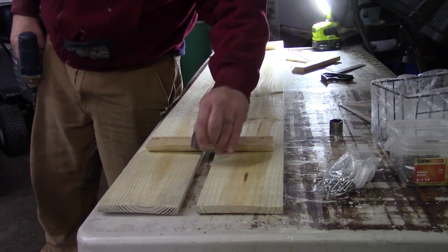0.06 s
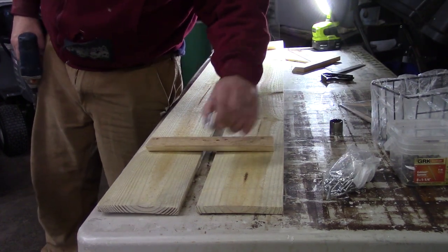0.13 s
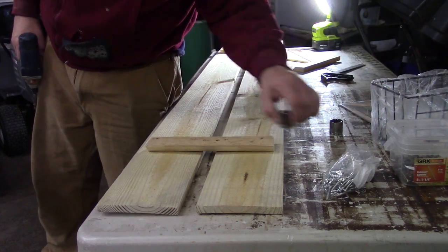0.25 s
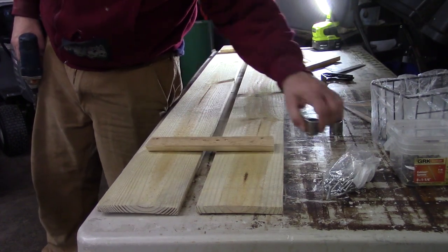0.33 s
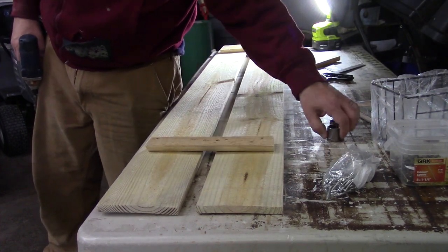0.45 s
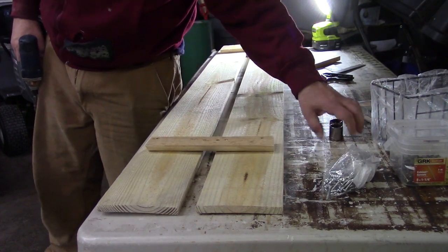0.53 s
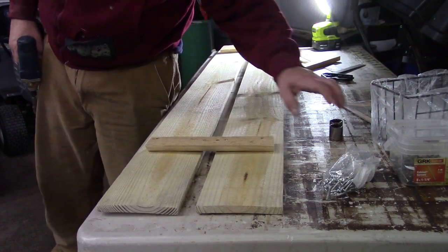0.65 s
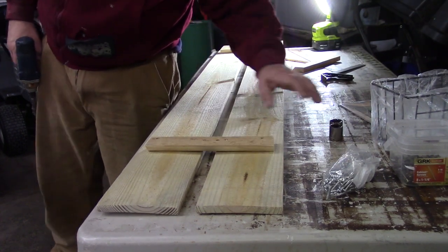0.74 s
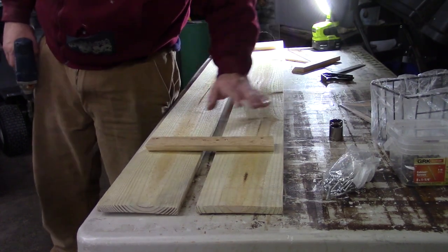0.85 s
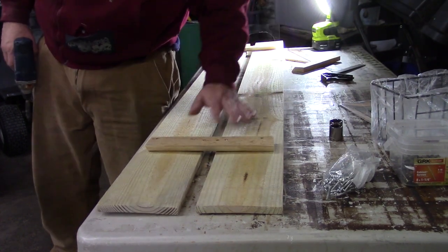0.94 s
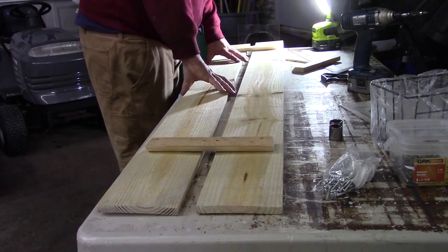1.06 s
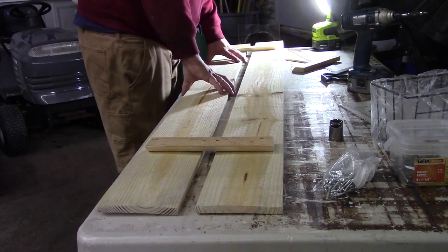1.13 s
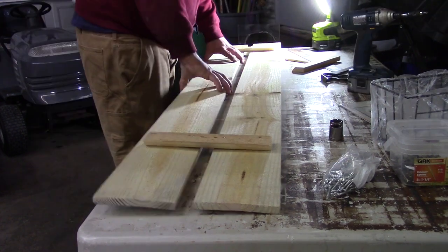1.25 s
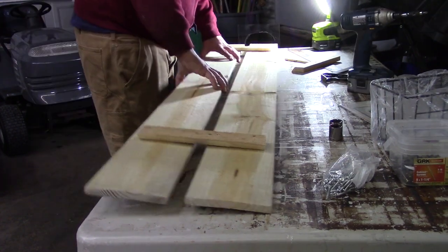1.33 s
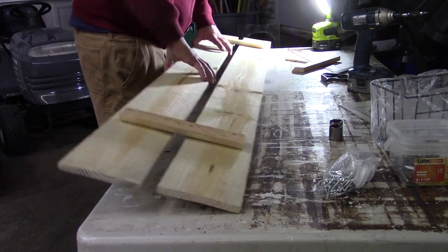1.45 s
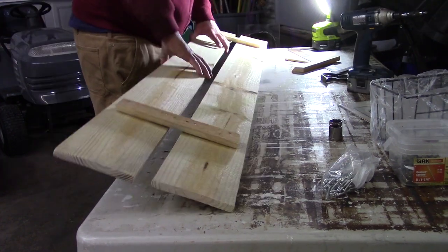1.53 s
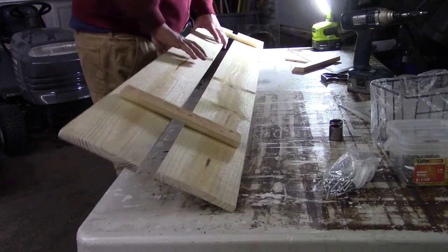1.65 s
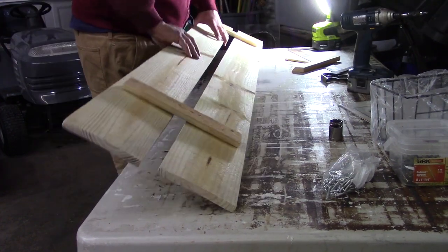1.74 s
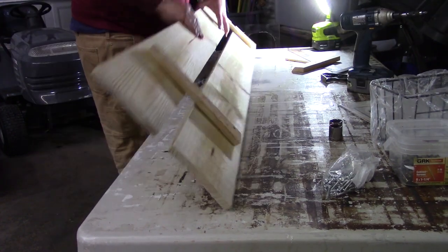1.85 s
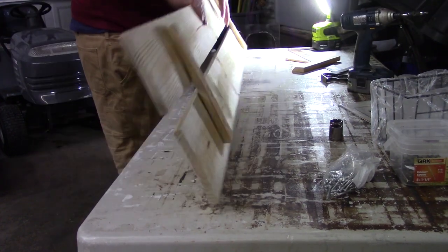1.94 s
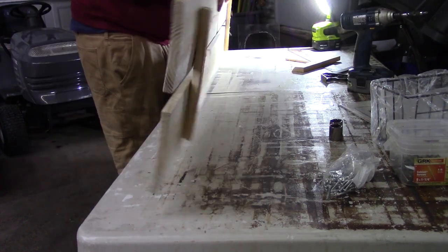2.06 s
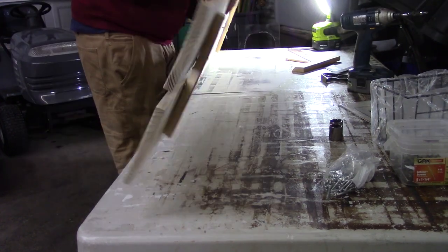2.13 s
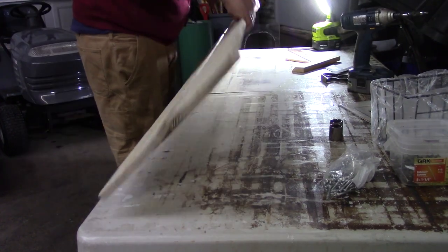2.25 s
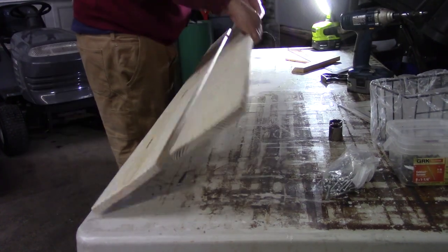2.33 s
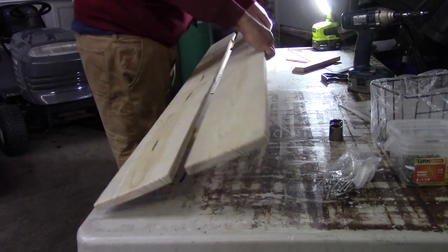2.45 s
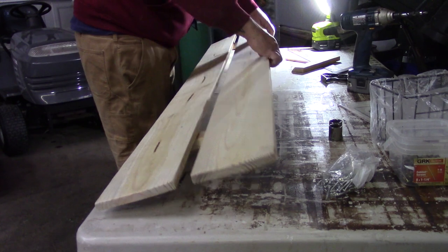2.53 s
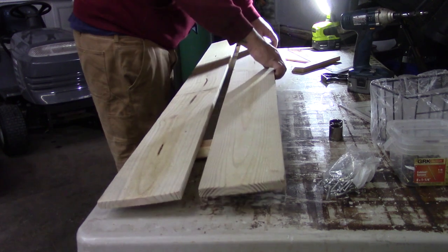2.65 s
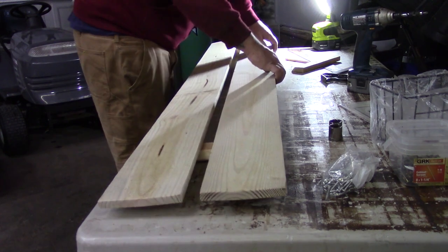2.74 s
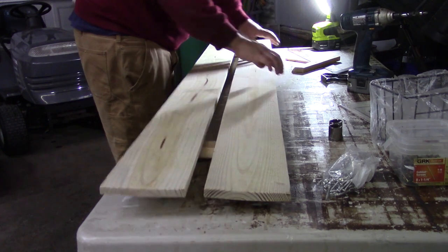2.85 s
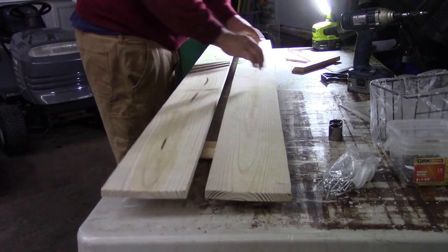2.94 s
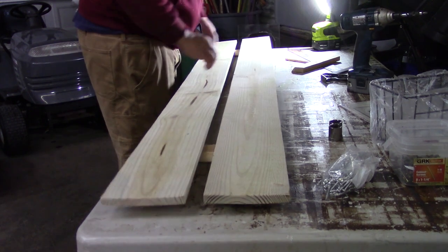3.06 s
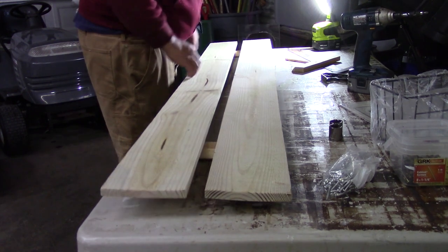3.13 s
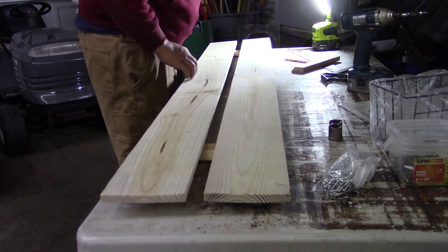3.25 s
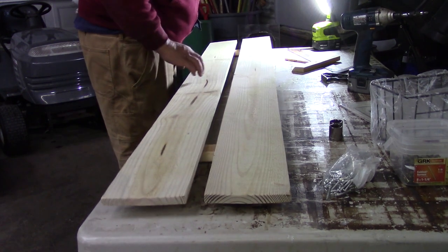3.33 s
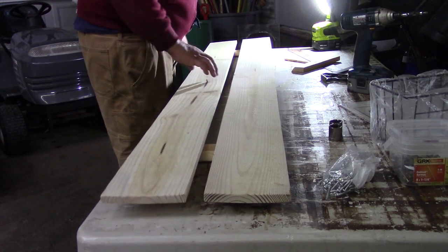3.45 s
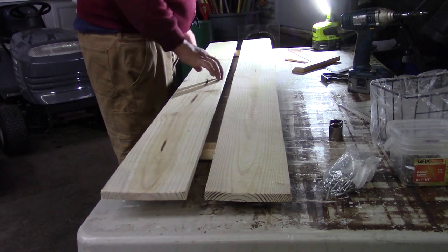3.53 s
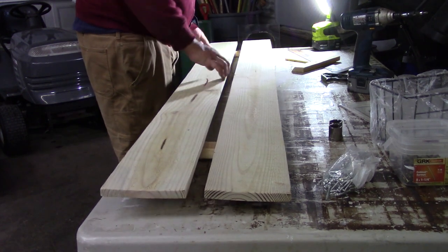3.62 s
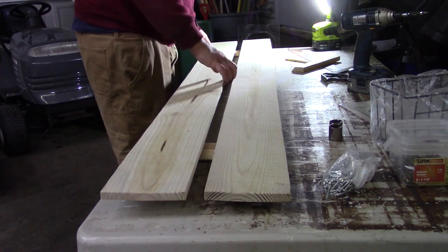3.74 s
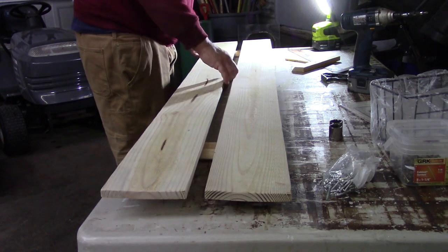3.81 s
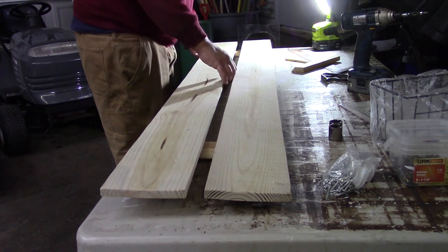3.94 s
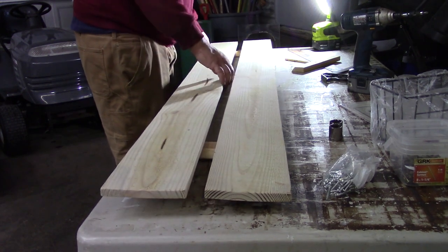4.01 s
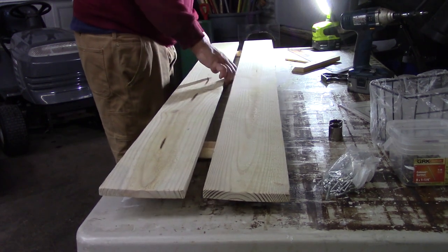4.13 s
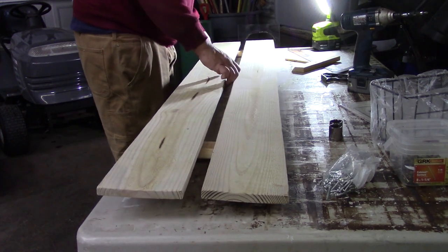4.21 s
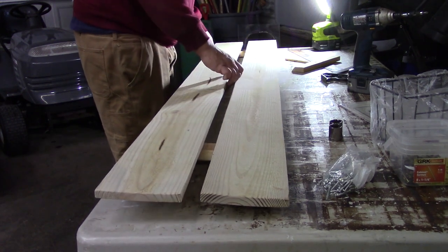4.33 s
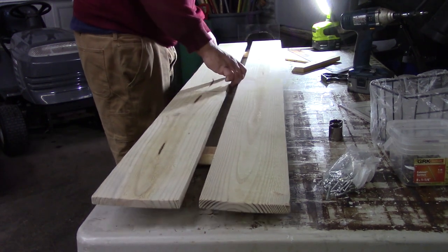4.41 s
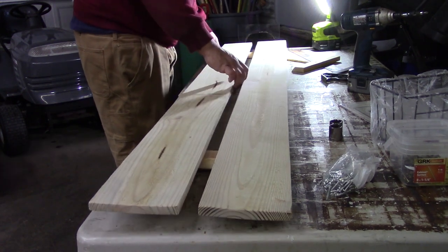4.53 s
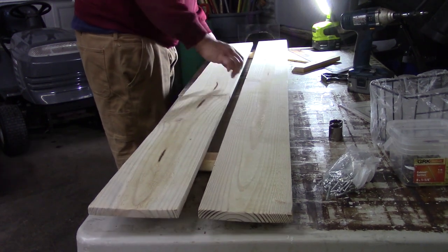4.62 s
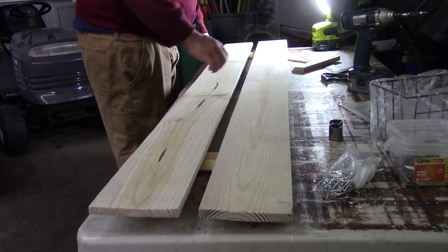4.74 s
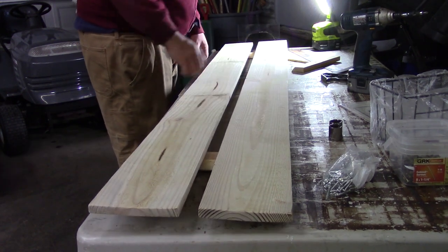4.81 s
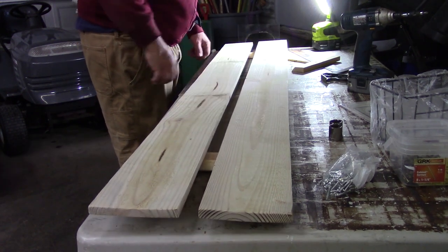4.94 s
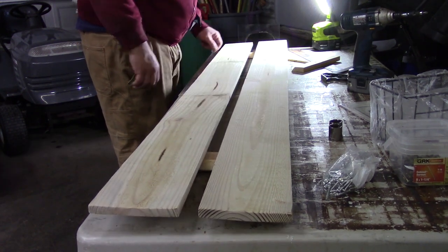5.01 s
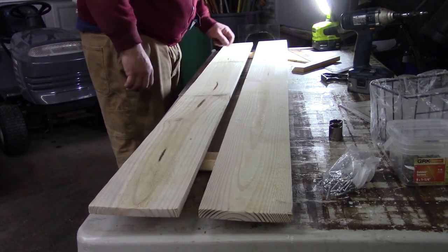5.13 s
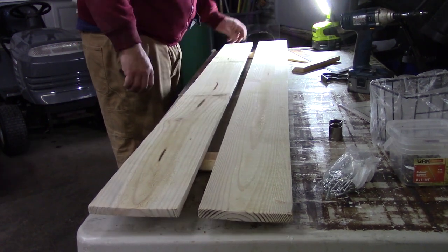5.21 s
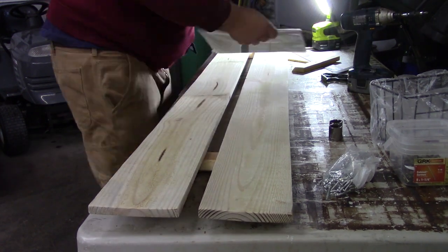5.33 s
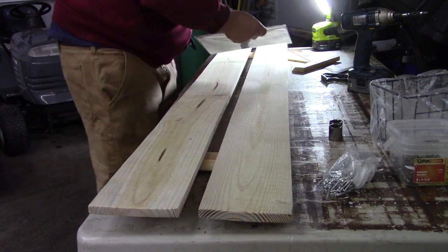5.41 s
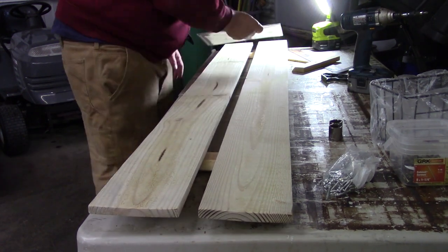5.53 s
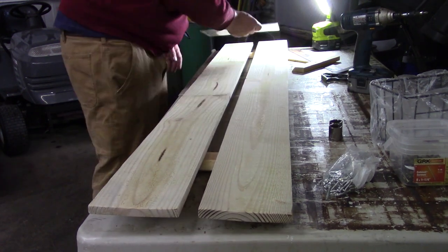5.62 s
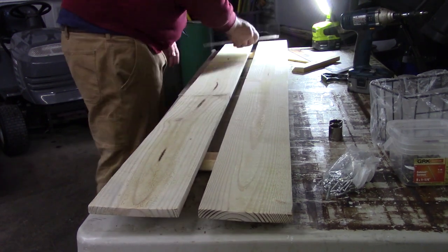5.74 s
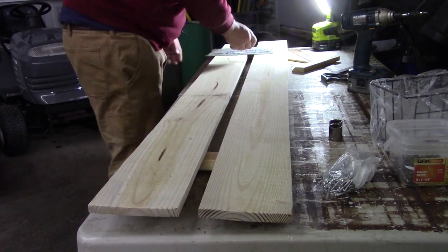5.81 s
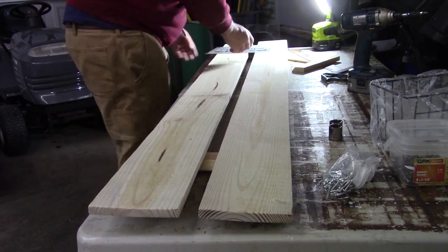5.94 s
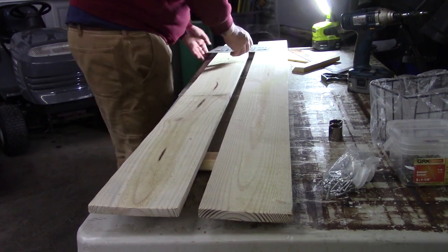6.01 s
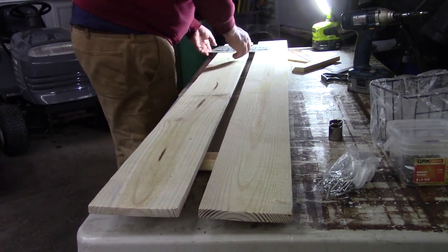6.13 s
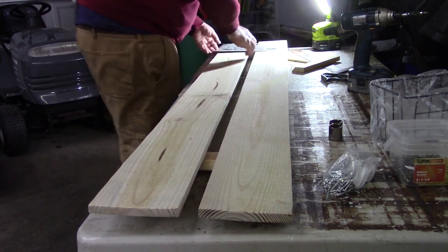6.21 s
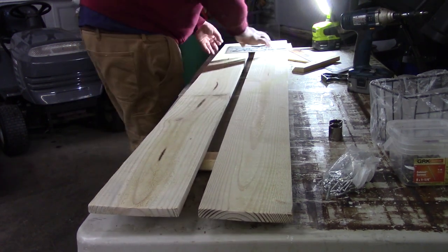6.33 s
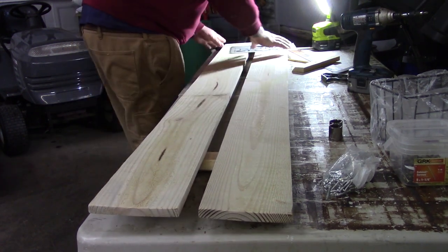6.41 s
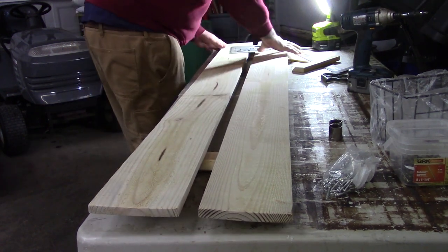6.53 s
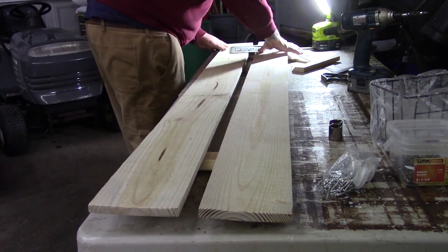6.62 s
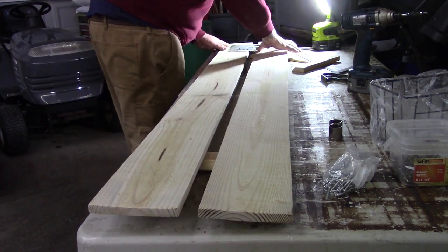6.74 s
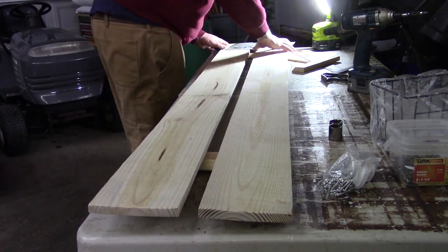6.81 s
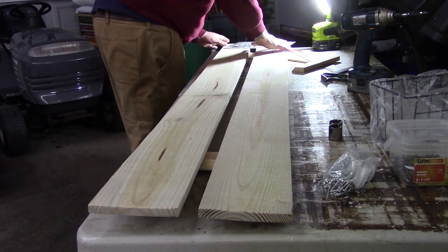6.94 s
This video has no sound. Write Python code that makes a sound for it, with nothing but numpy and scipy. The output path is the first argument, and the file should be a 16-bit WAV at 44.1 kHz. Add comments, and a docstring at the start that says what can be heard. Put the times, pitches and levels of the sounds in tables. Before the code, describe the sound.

A joined pair of pine boards scrapes, flips and clatters down on a folding table, then is pushed straight before a loose batten slaps onto it.

```python
"""Boards on a garage table

Two pine boards joined by a batten are dragged, flipped, dropped and pushed straight on a folding table.
They land one after the other and rattle; a tool is set down and a loose batten is slapped on.
Blows are bursts of tiny contacts that ring the wood and the table top; scrapes are streams of such contacts.
Small bumps, grit, squeaks and sleeves add detail; a room echo, mains hum and still air lie around it all."""
import sys
import numpy as np
from scipy import signal
from scipy.fft import rfft, irfft, next_fast_len
from scipy.io import wavfile
from scipy.ndimage import uniform_filter1d, minimum_filter1d

SR = 44100
rng = np.random.default_rng(int(sys.argv[2]) if len(sys.argv) > 2 else 0)


def generate_wav(signal):
    """Clip the signal to [-1, 1] and save it as 16-bit WAV at the path in sys.argv[1]."""
    frames = np.transpose(np.atleast_2d(signal))
    scaled = np.clip(frames, -1, 1) * 32767
    pcm = np.round(scaled).astype(np.int16)
    wavfile.write(sys.argv[1], SR, pcm)


N = 307377
TIME = np.arange(N) / SR
RING = TIME[:SR // 2]  # time axis of one short sound

# Event levels are starting levels, before the trims, the room and the mix.
# Mode and colour levels are relative: they shape a sound that is scaled afterwards.

# The panel falls flat and rocks, one board just before the other, then rattles:
# (time [s], first board's level [dB], delay of second board [s], its level [dB], brightness [dB per octave],
#  rattle level [dB], rattle fading [dB per s], rattle length [s])
PANEL_LANDINGS = [(2.4005, -13, 0.014, -13.5, 0.5, -23, 71, .22),
                  (2.8935, -16, .008, -13.5, 0, -13.5, 126, .06),
                  (3.014, -19.5, .016, -19.5, -0.94, -20, 199, .04),
                  (3.107, -18, .012, -16, -0.25, -29.5, 130, .06),
                  (3.23, -27.5, .014, -21.5, -0.5, -24, 93, .17)]
# Single bumps of the panel's edges:
# (time [s], level [dB], brightness [dB per octave], decay of the contact's chatter [s])
PANEL_BUMPS = [(1.315, -43.5, -1, .012), (1.498, -31, 4.5, 0.022), (2.143, -35.5, 0.5, 0.017),
               (2.213, -28, -2, 0.032), (2.608, -37.5, 3.5, 0.0089), (2.665, -36.5, 2, 0.024),
               (2.724, -35, -3, 0.025), (2.778, -34.5, -3, 0.036), (4.155, -40.5, -4.5, 0.027),
               (6.115, -39.5, -2, 0.034)]
# Strongest notes of the panel: (frequency [Hz], level [dB])
PANEL_MODES = [(226.1, -32), (360.7, -27.5), (441.4, -28.5), (812.9, -32.5), (947.5, -34.0), (1249, -48),
               (1432, -33), (1588, -37), (1787, -59), (1938, -33.5), (2180, -32), (2455, -39), (2546, -34),
               (2735, -43), (2848, -30), (3052, -36), (3171, -37.0), (130, -54), (163, -45), (184, -47),
               (266, -33.5), (291, -27.0), (325, -66.0), (545, -32.5), (660, -42)]
# The crowd of weaker notes in the panel: (frequency [Hz], level [dB])
PANEL_COLOUR = [(29, -85), (50, -56), (96, -11.5), (171, -6.5), (229, -0.5), (258, -1), (362, 1.5),
                (408, -2), (450, -3.5), (1330, -14), (2950, -19), (8340, -33), (12600, -46.5), (16000, -54)]


def panel_blows():
    """The joined boards land, rattle and bump, ringing as wide pieces of wood."""
    falls = landings(PANEL_LANDINGS, first_chatter=0.015, second_chatter=.016, rattle_chatter=.024,
                     rattle_bright_db=0)
    return blows(falls + PANEL_BUMPS, PANEL_MODES, PANEL_COLOUR, modes_db=-8.5, crack_db=-13,
                 t60=0.19, t60_slope=0.73, detune=0.0093,
                 hollow_hz=229, hollow_width_hz=72, hollow_db=-9.5, lowest_hz=100)


# The batten is slapped down, one end just before the other:
# (time [s], first end's level [dB], delay of second end [s], its level [dB], brightness [dB per octave],
#  rattle level [dB], rattle fading [dB per s], rattle length [s])
BATTEN_LANDINGS = [(5.845, -14.5, .0115, -7.5, 1, -13.5, 170, .06)]
# The batten is nudged into place:
# (time [s], level [dB], brightness [dB per octave], decay of the contact's chatter [s])
BATTEN_NUDGES = [(6.3401, -32, -4.5, 0.044), (6.881, -34.5, -2.2, .025)]
# Strongest notes of the batten: (frequency [Hz], level [dB])
BATTEN_MODES = [(360.7, -38), (640.6, -32), (845.2, -29.5), (904.4, -29), (979.8, -30), (1061, -29.5),
                (1217, -36), (1480, -40), (1561, -50), (1776, -33), (1970, -38), (2078, -42), (2143, -53),
                (2272, -52), (2439, -42), (2998, -41), (3165, -38), (3262, -28.5), (3790, -30), (4129, -60)]
# The crowd of weaker notes in the batten: (frequency [Hz], level [dB])
BATTEN_COLOUR = [(35, -66), (60, -31), (118, -0.5), (244, -8), (281, 1), (593, -5.5), (651, -5.5),
                 (767, -0.5), (822, 3), (1140, -9.5), (1510, 0.5), (2470, -8.5), (9130, -16.5),
                 (16000, -33)]


def batten_blows():
    """The loose batten slaps, rattles and is nudged, ringing with its own set of notes."""
    falls = landings(BATTEN_LANDINGS, first_chatter=0.017, second_chatter=0.012, rattle_chatter=0.012,
                     rattle_bright_db=-2.5)
    return blows(falls + BATTEN_NUDGES, BATTEN_MODES, BATTEN_COLOUR, modes_db=-4, crack_db=-23,
                 t60=0.27, t60_slope=0.87, detune=0.0048,
                 hollow_hz=1750, hollow_width_hz=870, hollow_db=-4, lowest_hz=185)


# Blows on the table top:
# (time [s], level [dB], brightness [dB per octave], decay of the contact's chatter [s])
TABLE_BLOWS = [(.5218, -10.5, -1.5, 0.0047), (.533, -19, -6.5, 0.0041), (.5455, -25, -1, 0.0074),
               (.5525, -26.5, -4, 0.002), (.595, -31.5, -3, 0.0061)]
# Strongest notes of the table top: (frequency [Hz], level [dB])
TABLE_MODES = [(183.0, -50), (226.1, -43), (296.1, -32.5), (333.8, -28), (446.8, -41), (527.6, -38),
               (656.8, -31), (829.0, -62), (963.6, -33), (1050, -33), (1303, -49), (1803, -35), (1890, -51),
               (2218, -34.5), (2891, -50), (3063, -43), (3214, -42.5), (3289, -37)]
# The crowd of weaker notes in the table top: (frequency [Hz], level [dB])
TABLE_COLOUR = [(40, -19), (100, -43), (190, -8.5), (260, -3.5), (370, -14), (460, -8.5), (900, -9.5),
                (1400, -8), (2200, -15.5), (3100, -10.5), (4200, -20.5), (7000, -26), (10000, -39),
                (16000, -59)]


def table_blows():
    """The tool's short, hard contacts ring the table top, which dies away quickly."""
    return blows(TABLE_BLOWS, TABLE_MODES, TABLE_COLOUR, modes_db=-4.5, crack_db=-5.5,
                 t60=0.1, t60_slope=0.45, detune=0.0021,
                 hollow_hz=446, hollow_width_hz=115, hollow_db=-1.5, lowest_hz=113)


def landings(rows, first_chatter, second_chatter, rattle_chatter, rattle_bright_db):
    """A landing is two hard contacts, then uneven knocks that tend to grow weaker and duller."""
    gap_s, gap_scatter = .024, .2  # time between knocks; its scatter as a share of the gap
    level_scatter_db, dulling = 1.5, 12.6  # dulling in dB per octave per second
    hits = []
    for s, first_db, lag, second_db, bright_db, rattle_db, fading, length in rows:
        hits.append((s, first_db, bright_db, first_chatter))
        hits.append((s + lag, second_db, bright_db, second_chatter))
        for k, (early, strong) in enumerate(rng.standard_normal(size=(16, 2))):
            age = k * gap_s
            if age < length:
                moment = s + lag + age + gap_s * (1 + gap_scatter * early)
                level_db = rattle_db - fading * age + level_scatter_db * strong
                knock_bright_db = bright_db + rattle_bright_db - dulling * age
                hits.append((moment, level_db, knock_bright_db, rattle_chatter))
    return hits


def blows(rows, modes, body, modes_db, crack_db, t60, t60_slope, detune,
          hollow_hz, hollow_width_hz, hollow_db, lowest_hz):
    """Each blow cracks, chatters briefly into the dense weak notes and rings the strong ones."""
    hz, db = np.transpose(modes)[:, :, None]
    life = t60 * (hz / 500) ** -t60_slope  # seconds to fall 60 dB: high notes die sooner
    fading = np.exp(-np.log(1000) * RING / life)
    rings = undb(db) / np.sqrt(life) * fading * np.sin(2 * np.pi * hz * RING)
    out = np.zeros(N)
    for s, level_db, bright_db, chatter in rows:
        contact = burst(grains(len(RING), 9000, 0.31) * np.exp(-RING / chatter))
        contact[0] += undb(crack_db) * np.sqrt(SR / 20)  # the crack is one sharp click
        dense = burst(colour(contact, body, bright_db))
        # the wood right under the blow gives one broad, short-lived note
        narrowed = band(contact, hollow_hz, hollow_width_hz)
        hollow = burst(band(narrowed, hollow_hz, hollow_width_hz * 2))
        # the place of the blow sets the share of every note
        share_db = 2 * rng.standard_normal(len(hz)) + bright_db * np.log2(hz[:, 0])
        shares = rng.choice([-1, 1], len(hz)) * undb(share_db)
        # grip and support shift the pitch of all notes together
        stretched = RING * (1 + detune * rng.standard_normal())
        strong = burst(np.interp(stretched, RING, shares @ rings))
        blow = burst(dense + undb(hollow_db) * hollow + undb(modes_db) * strong)
        add(out, s, undb(level_db) * blow)
    # take away the deep bass below lowest_hz
    return signal.sosfilt(signal.butter(4, lowest_hz, "high", fs=SR, output="sos"), out)


# The whole table top heaves: (time [s], level [dB])
HEAVES = [(.523, -47), (2.401, -48), (2.47, -47), (2.895, -26), (3.029, -38), (3.117, -35), (5.87, -40.5)]


def heaves(sag_hz, width_hz, decay):
    """The whole table top sags and springs back with a dull thud."""
    out = np.zeros(N)
    for s, db in HEAVES:
        thud = rng.standard_normal(len(RING)) * np.exp(-RING / decay)
        for _ in range(3):
            thud = band(thud, sag_hz, width_hz)
        add(out, s, undb(db) * burst(thud))
    return out


# The panel's edge drags as it is tipped over:
# (time at full speed [s], rise [s], hold [s], fall [s], level of the wood [dB], hiss relative to it [dB])
EDGE_DRAG = [(1.2, 0.24, .05, .15, -52, -10), (1.365, 0.14, 0.018, 0.092, -38, -7),
             (1.44, .1, 0.045, .03, -36, -12.5), (1.507, 0.015, 0.055, 0.081, -21.5, -8.5),
             (1.955, .11, 0.031, 0.11, -24, -10.5), (2.03, 0.4, 0.12, 0.12, -41, -9),
             (2.27, 0.15, 0.15, 0.068, -36, -14), (2.86, 0.051, 0.019, .015, -37, -11)]
# Tone of the dragging edge: (frequency [Hz], level [dB])
DRAG_COLOUR = [(35, -51), (60, -29), (164, -3), (238, -3.5), (363, 1), (417, -6), (593, -4), (803, -9.5),
               (1110, -7.5), (2770, -17.5), (3040, -17), (4640, -27.5), (8320, -31), (16000, -49.5)]


def edge_drag():
    """The panel's edge catches and slips along the table."""
    return slide(EDGE_DRAG, DRAG_COLOUR, rate=6600, spread_db=-0.5, judder_db=0.5, peaks_db=-8.5,
                 wood_db=-1.5, hiss_db=-0.5)


# The panel is pushed straight:
# (time at full speed [s], rise [s], hold [s], fall [s], level of the wood [dB], hiss relative to it [dB])
PANEL_PUSH = [(3.73, 0.13, 0.16, 0.046, -42, -9.5), (3.945, .015, 0.1, 0.056, -34.5, -13),
              (4.17, 0.05, 0.013, 0.046, -40.5, -5), (4.255, 0.043, 0.081, 0.19, -34, -2.5),
              (4.48, 0.29, .16, .08, -24.5, -1)]
# Tone of the pushed panel: (frequency [Hz], level [dB])
PUSH_COLOUR = [(47, -57), (80, -17), (217, 4.5), (253, -4.5), (283, 11.5), (395, -1.5), (588, 1.5),
               (734, -3.5), (785, 4), (2040, -8), (2660, -15.5), (4730, -29.5), (7360, -29.5),
               (14600, -49.5), (16000, -45)]


def panel_push():
    """The panel rumbles and hisses as it slides, with its resonances standing out clearly."""
    return slide(PANEL_PUSH, PUSH_COLOUR, rate=5100, spread_db=-2, judder_db=-1.0, peaks_db=0,
                 wood_db=-8.0, hiss_db=-5.0)


# The batten is drawn across the boards:
# (time at full speed [s], rise [s], hold [s], fall [s], level of the wood [dB], hiss relative to it [dB])
BATTEN_SCRAPE = [(5.55, 0.15, 0.045, .03, -52, 0), (5.655, 0.082, 0.082, 0.056, -32, 0.24),
                 (5.8, 0.064, 0.03, .02, -45, 2)]
# Tone of the scraping batten: (frequency [Hz], level [dB])
SCRAPE_COLOUR = [(88, -36), (150, -17), (201, -9), (259, -15), (354, 2.5), (514, -6), (649, -1.5),
                 (1870, -6), (2870, 0.5), (4000, -6.5), (7320, -7), (12200, -23), (16000, -32)]


def batten_scrape():
    """Wood drawn over wood makes a dense stream of contacts with a strong judder."""
    return slide(BATTEN_SCRAPE, SCRAPE_COLOUR, rate=8600, spread_db=1, judder_db=4.0, peaks_db=-23,
                 wood_db=-3.0, hiss_db=-2.0)


# A hand rubs the batten:
# (time at full speed [s], rise [s], hold [s], fall [s], level of the wood [dB], hiss relative to it [dB])
HAND_RUB = [(6.69, .13, .08, .1, -45, -0.5), (6.83, 0.12, 0.063, 0.18, -31.5, -6)]
# Tone of the rubbing hand: (frequency [Hz], level [dB])
RUB_COLOUR = [(60, -34), (120, -9.5), (350, -1), (600, -11), (850, -1.5), (1400, -2.5), (2200, -7.5),
              (5000, -17), (11000, -17), (16000, -36)]


def hand_rub():
    """Skin on wood makes a stream of contacts of very uneven strength."""
    return slide(HAND_RUB, RUB_COLOUR, rate=5600, spread_db=3.0, judder_db=2.5, peaks_db=-22,
                 wood_db=-7.0, hiss_db=-5.5)


# Resonances that sliding brings out: (frequency [Hz], width [Hz], level [dB])
SLIDE_PEAKS = [(616, 32, -5), (1400, 82, -1), (2650, 180, 2), (3120, 61, -15), (3780, 230, -4),
               (3940, 120, -8), (6150, 230, -25)]


def slide(strokes, body, rate, spread_db, judder_db, peaks_db, wood_db, hiss_db):
    """Fibres catch and let go in uneven bunches; the wood rumbles and its surface hisses."""
    contacts = grains(N, rate, spread_db) * undb(judder_db * walk(90))
    rub = colour(contacts, body)
    rub = rub + sum(undb(peaks_db + db) * band(rub, hz, width) for hz, width, db in SLIDE_PEAKS)
    # split at 3500 Hz: rumbling wood below, hissing surface above
    wood = unit(signal.sosfilt(signal.butter(3, 3500, "low", fs=SR, output="sos"), rub))
    hiss = unit(signal.sosfilt(signal.butter(3, 3500, "high", fs=SR, output="sos"), rub))
    wood_power = hiss_power = 0
    for s, rise, hold, fall, db, rel_db in strokes:
        gain = undb(db) * stroke(s, rise, hold, fall)
        wood_power = wood_power + gain ** 2
        hiss_power = hiss_power + (gain * undb(rel_db)) ** 2
    rumble = undb(wood_db) * wood * np.sqrt(wood_power)
    return rumble + undb(hiss_db) * (hiss + grit()) * np.sqrt(hiss_power)


def stroke(s, rise, hold, fall):
    """Gain of one sliding movement: it swells, holds and dies away."""
    before = np.maximum(s - TIME, 0) / max(rise, .002)
    after = np.maximum(TIME - s - hold, 0) / max(fall, .002)
    return undb(-20 * np.minimum(before + after, 10))  # rise and fall each span 20 dB


# Light knocks of hands and loose wood: (time [s], level [dB], pitch [Hz], width of the resonance [Hz])
KNOCKS = [(.037, -39, 574, 282), (1.069, -42.5, 895, 660), (1.081, -41, 324, 158),
          (2.144, -45.5, 3450, 1500), (2.212, -39, 640, 340), (6.275, -46.5, 1150, 696),
          (6.339, -35, 1550, 540), (6.349, -37, 940, 350), (6.385, -43.5, 1020, 520),
          (6.492, -43, 460, 335)]


def knocks(attack, decay):
    """A soft contact wakes one broad resonance of the wood."""
    out = np.zeros(N)
    for s, db, hz, width in KNOCKS:
        push = rng.standard_normal(len(RING)) * np.minimum(RING / attack, 1) * np.exp(-RING / decay)
        add(out, s, undb(db) * burst(band(band(push, hz, width), hz, width * 3)))
    return out


# The larger bits of grit snapping: (time [s], level [dB], brightness [dB per octave])
TICKS = [(1.068, -57, -4), (2.098, -45.5, -0.5), (3.726, -48.5, -6), (3.763, -48, -7), (3.938, -44, -5),
         (4.028, -49.5, -2), (4.183, -51.5, -.5), (4.26, -43.5, 0), (4.33, -43.5, 5), (5.604, -56, -1),
         (5.739, -40.5, 0), (6.68, -48, 3.5), (6.813, -43, 2), (6.882, -43.5, 6)]
# Tone of snapping grit, large and fine: (frequency [Hz], level [dB])
TICK_COLOUR = [(40, -27), (150, -1.5), (500, -7), (2000, 5.5), (7000, -1), (12000, -6), (16000, -20)]


def ticks(decay):
    """Grit cracks under the boards in short bursts of noise."""
    out = np.zeros(N)
    for s, db, bright_db in TICKS:
        snap = rng.standard_normal(len(RING)) * np.exp(-RING / decay)
        add(out, s, undb(db) * burst(colour(snap, TICK_COLOUR, bright_db)))
    return out


def grit():
    """Sparse snaps of sawdust and splinters, heard with the hiss of anything that slides."""
    snap = rng.standard_normal(len(RING)) * np.exp(-RING / 0.0017)
    snaps = signal.fftconvolve(grains(N, 70, -1), snap)[:N]  # about 70 a second
    return undb(-12.5) * unit(colour(snaps, TICK_COLOUR))


# Faint squeaks: (time of the middle [s], level [dB], pitch [Hz])
SQUEAKS = [(.304, -59, 2250), (4.012, -47, 1800)]


def squeaks(length, width_hz):
    """Dry surfaces stick and slip unevenly for a moment around one pitch."""
    out = np.zeros(N)
    for s, db, hz in SQUEAKS:
        swell = np.sin(np.pi * np.minimum(RING / length, 1)) ** 2
        slips = rng.standard_normal(len(RING)) * swell
        add(out, s - length / 2, undb(db) * burst(band(band(slips, hz, width_hz), hz, width_hz)))
    return out


# Sleeves brushing the wood: (time at full speed [s], rise [s], hold [s], fall [s], level [dB])
SLEEVE = [(.03, .08, .02, 0.037, -53), (0.732, .008, .012, 0.06, -52), (6.635, .01, .015, 0.027, -49.5),
          (1.01, .01, 0.033, .06, -58), (6.066, 0.076, .015, 0.12, -47.5), (6.308, .17, 0.057, .24, -49.5)]


def sleeve(low_hz, high_hz, db):
    """Cloth gives a thin, fine-grained hiss."""
    cloth_band = signal.butter(1, [low_hz, high_hz], "band", fs=SR, output="sos")
    hiss = unit(signal.sosfilt(cloth_band, grains(N, 12000, 1.0)))
    return hiss * sum(undb(level_db + db) * stroke(s, rise, hold, fall)
                      for s, rise, hold, fall, level_db in SLEEVE)


# Reverberation of the garage: (frequency [Hz], time to fall 60 dB [s])
GARAGE = [(100, 0.59), (400, 0.45), (1000, 0.45), (2500, 0.3), (5000, 0.3), (9000, 0.18), (15000, 0.2)]


def garage(x, wet_db):
    """The sound plus its reverberation: fading noise whose treble dies sooner than its bass."""
    hz = np.fft.rfftfreq(len(RING), 1 / SR)
    noise, tail = rfft(rng.standard_normal(len(RING))), 0
    for centre, t60 in GARAGE:
        share = lookup([(f, f == centre) for f, _ in GARAGE], hz)
        tail = tail + irfft(noise * share, len(RING)) * np.exp(-np.log(1000) * RING / t60)
    # floor and ceiling answer after a few milliseconds
    tail = tail * np.clip((RING - .004) / 0.0039, 0, 1) / np.sqrt(SR * 0.019)
    return x + undb(wet_db) * signal.fftconvolve(x, tail)[:N]


# Mains hum: (frequency [Hz], level [dB])
HUM = [(120, -61), (240, -64), (360, -49.5), (480, -67), (720, -68.5), (1080, -86)]


def hum():
    """Steady tones of the mains, each wavering slightly in level."""
    return sum(undb(db + .5 * walk(5)) * np.sqrt(2) * np.sin(2 * np.pi * (hz * TIME + rng.random()))
               for hz, db in HUM)


# Tone of the room air: (frequency [Hz], level [dB])
AIR = [(15, -74), (25, -39), (64, -10.5), (114, -10.5), (249, -5), (301, -6.5), (363, -6), (416, -7),
       (714, -13.5), (775, -12), (1890, -19), (2110, -16.5), (2480, -22), (11000, -36), (16000, -46)]


def air():
    """Still room air: soft coloured noise that wavers a little around -53 dB."""
    return undb(-53 + .5 * walk(3.6)) * unit(colour(rng.standard_normal(N), AIR))


def undb(db):
    """Decibels to gain."""
    return 10 ** (np.asarray(db) / 20)


def unit(x):
    """Scale to an average (rms) level of 1."""
    return x / np.sqrt(np.mean(x ** 2))


def burst(x):
    """Scale a short sound to the energy of 50 ms at rms 1."""
    return x * np.sqrt(SR / 20 / np.sum(x ** 2))


def lookup(points, hz):
    """Read (frequency, value) points on a log-frequency axis."""
    f, value = np.transpose(points)
    return np.interp(np.log(hz + 1), np.log(f), value)


def colour(x, points, tilt_db=0):
    """Filter through (frequency, level) points, tilted by some dB per octave, without sounding early."""
    size = 2 * next_fast_len(len(x))
    hz = np.fft.rfftfreq(size, 1 / SR)
    db = lookup(points, hz) + tilt_db * np.log2(np.clip(hz, 200, 12000) / 1000)
    # folding the cepstrum gives minimum phase: the filter only answers after its input
    cepstrum = irfft(np.log(undb(db)))
    cepstrum[1:size // 2] *= 2
    cepstrum[size // 2 + 1:] = 0
    return irfft(rfft(x, size) * np.exp(rfft(cepstrum)))[:len(x)]


def band(x, hz, width):
    """One resonance, gain 1 at its centre."""
    return signal.lfilter(*signal.iirpeak(hz, hz / width, fs=SR), x)


def grains(size, rate, spread_db):
    """Random tiny contacts, about so many a second; the spread makes their strengths uneven."""
    strength = undb(spread_db * np.minimum(rng.exponential(size=size), 4))
    happens = rng.random(size) < rate / SR
    return unit(happens * rng.standard_normal(size) * strength)


def walk(rate):
    """Slow random wavering with rms 1, heading for a new value so many times a second."""
    k = int(SR / rate)
    steps = np.repeat(rng.standard_normal(N // k + 1), k)
    return unit(uniform_filter1d(steps, k)[:N])


def add(track, s, sound):
    """Mix a sound into a track at a time."""
    i = max(int(s * SR), 0)
    track[i:i + len(sound)] += sound[:N - i]


def scene():
    """The panel and table are near; the batten lies at the far end and sounds wetter."""
    slides = edge_drag() + panel_push() + batten_scrape() + hand_rub()
    small = ticks(decay=0.0048) + knocks(attack=0.0075, decay=0.011)
    small = small + squeaks(length=0.03, width_hz=160) + sleeve(low_hz=3220, high_hz=9300, db=-4.0)
    near = panel_blows() + slides + small + heaves(sag_hz=115, width_hz=80, decay=0.017)
    far = undb(-4.5) * garage(batten_blows(), wet_db=-2)
    mid = garage(table_blows(), wet_db=-9.5) + garage(near, wet_db=-5.0) + far + air() + hum()
    # left and right differ only in reflections and room air
    reflections = garage(mid, wet_db=-9.5) - mid
    side_colour = [(100, -67), (500, -29), (2500, -20), (4500, -11.5), (9000, -16.5)]  # (Hz, dB)
    side = colour(reflections, side_colour) + undb(-12.5) * air()
    return np.array([mid + side, mid - side])


def record(dry):
    """A limiter ducks the loudest peaks on both sides together; the top above 15.9 kHz is cut."""
    hold = int(SR * 0.002)
    gain = np.minimum(1, .92 / (np.abs(dry).max(axis=0) + 1e-9))
    limited = dry * uniform_filter1d(minimum_filter1d(gain, 2 * hold), hold)
    return signal.sosfilt(signal.ellip(10, .2, 80, 15900, fs=SR, output="sos"), limited)


dry = scene()
out = record(dry)
generate_wav(out)
```